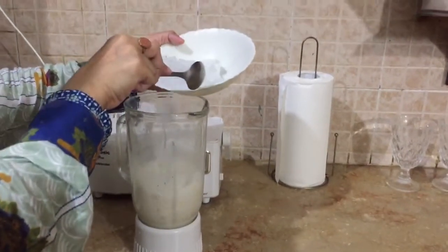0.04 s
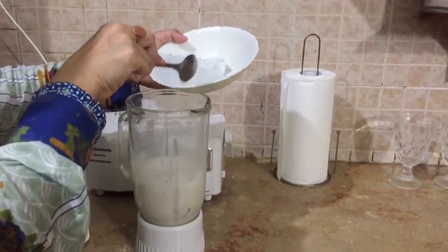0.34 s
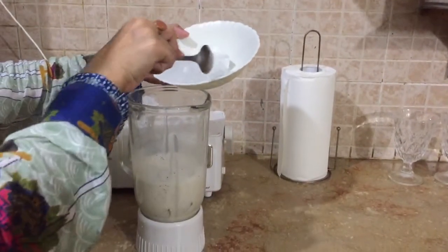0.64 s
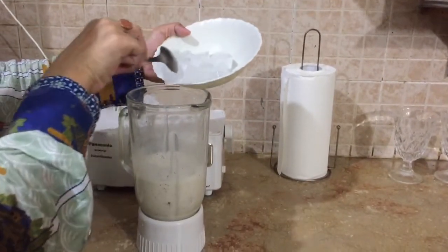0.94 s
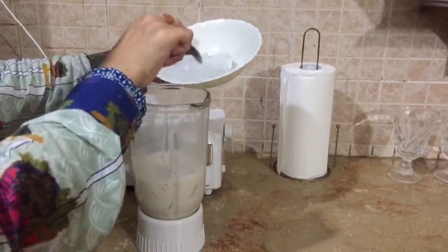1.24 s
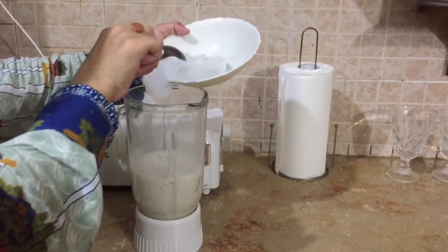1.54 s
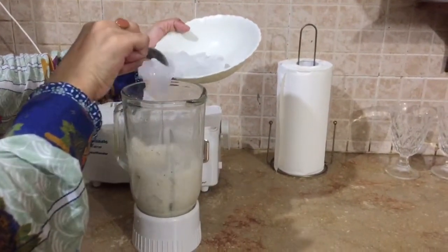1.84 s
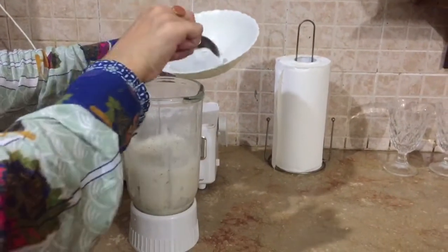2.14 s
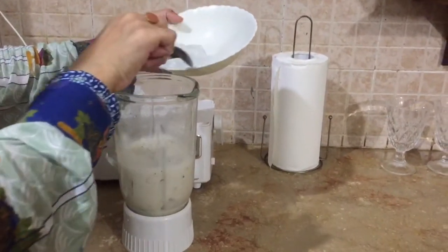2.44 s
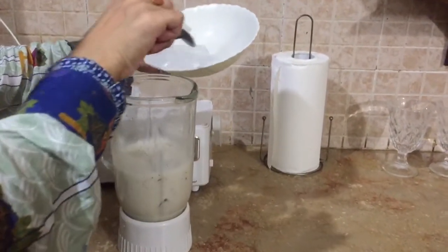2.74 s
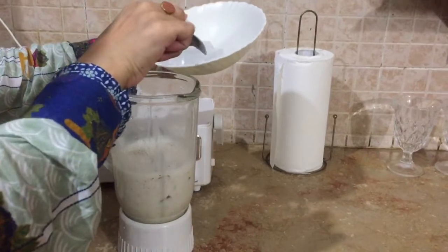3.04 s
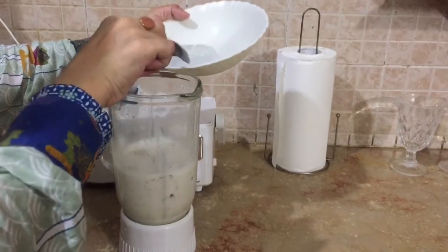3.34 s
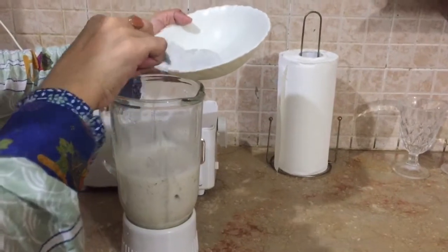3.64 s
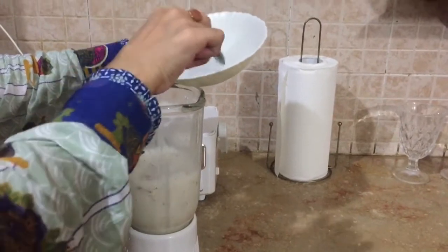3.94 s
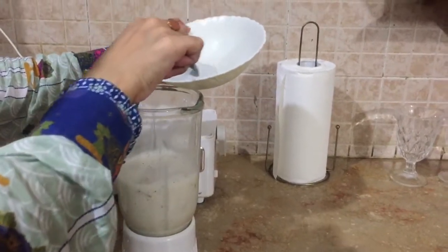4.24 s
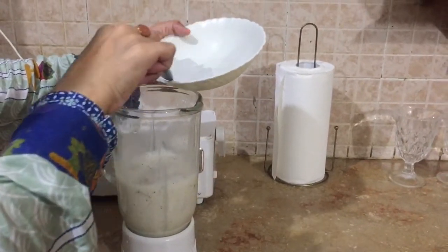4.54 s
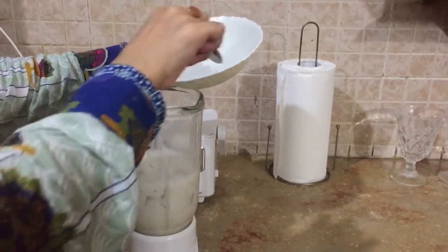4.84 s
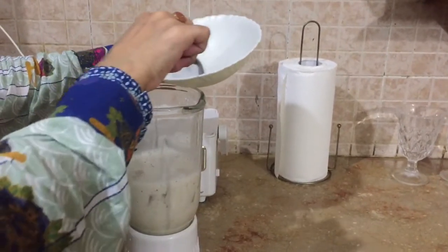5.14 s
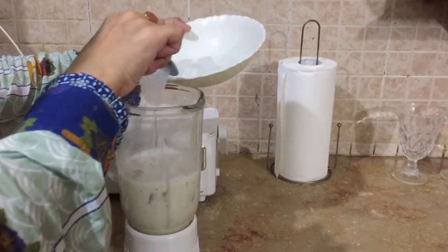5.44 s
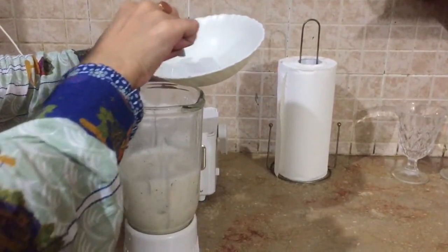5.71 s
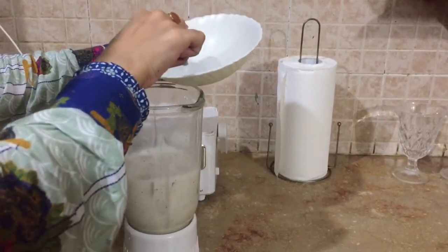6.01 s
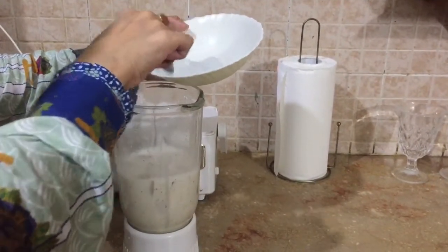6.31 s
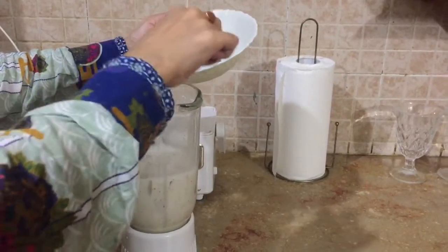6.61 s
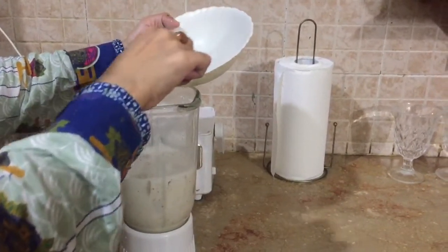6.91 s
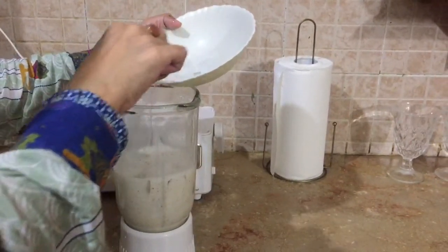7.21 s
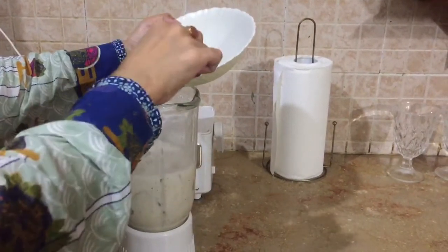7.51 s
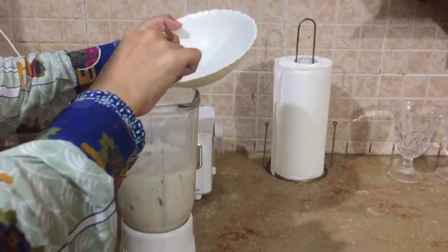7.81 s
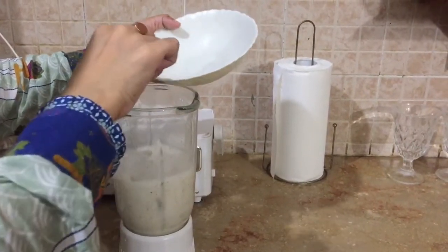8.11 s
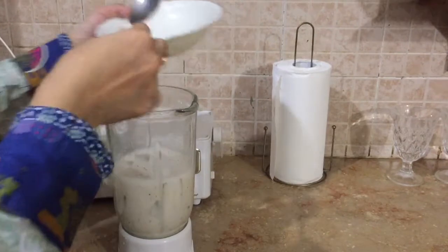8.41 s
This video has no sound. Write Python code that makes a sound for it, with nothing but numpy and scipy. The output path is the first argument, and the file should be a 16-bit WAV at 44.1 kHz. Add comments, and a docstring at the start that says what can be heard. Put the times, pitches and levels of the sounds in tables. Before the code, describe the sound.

A steel spoon clinks and scrapes in a ceramic bowl while ice cubes ping and thud into a glass blender jar holding liquid.

```python
"""Bright clinks, glassy pings and hollow thuds sound in a tiled kitchen, with faint scraping between them. A
steel spoon pushes ice cubes from a ceramic bowl into a glass blender jar part full of liquid. Each impact is a
burst of contact noise plus the damped modes of the body struck: spoon, bowl, jar or ice. Now and then the bowl
bumps the jar, ice clacks on the worktop and a sleeve rustles, over room air and mains hum."""
import sys
import numpy as np
from scipy import signal
from scipy.fft import rfft, irfft, next_fast_len
from scipy.io import wavfile
from scipy.ndimage import uniform_filter1d

SR = 44100
rng = np.random.default_rng(int(sys.argv[2]) if len(sys.argv) > 2 else 0)


def pcm_store(signal):
    """Save signal as 16-bit PCM."""
    levels = np.round(np.clip(np.atleast_2d(signal), -1, 1) * 32767)
    wavfile.write(sys.argv[1], SR, levels.astype(np.int16).T)


N = 381906
BLOW_SAMPLES = SR * 7 // 10  # one blow with its reverberation

# scraping strokes through the bowl: start_s, end_s, level_db
STROKES = [(-0.1, 0.076, -46.5), (0.401, 0.537, -47.5), (0.83, 1.14, -52.5), (1.268, 1.375, -54.5),
           (1.435, 1.514, -31.5), (2.765, 3.055, -58), (3.565, 4.09, -65), (4.352, 4.468, -56),
           (4.823, 4.889, -50), (5.476, 5.587, -57.5), (6.089, 6.17, -65.5), (6.502, 6.601, -39.5)]
# contact noise spectrum of steel on glaze: frequency_hz, relative_db
STEEL_CRACK = [(100, -30.5), (400, -16), (800, 2), (2000, 2), (4000, 4.5), (7000, -1.5), (10000, -6.5),
               (14000, -12.5), (16000, -6.5)]


def spoon_clinks():
    """The tip's impact excites the spoon's bending modes; a harder, shorter contact gives more treble."""
    # tip striking the bowl: start_s, level_db
    clinks = [(0.425, -36.5), (0.8571, -31), (0.925, -24.5), (0.967, -34), (1.094, -27), (1.743, -37),
              (1.791, -34), (2.03, -35.5), (2.1244, -33.5), (2.1402, -14), (2.1759, -21), (2.588, -46),
              (2.887, -42), (2.948, -48), (3.154, -20.5), (4.083, -16), (4.877, -11), (5.5234, -36),
              (5.639, -21), (5.7326, -30), (6.533, -33.5), (6.57, -12.5)]
    # spoon modes: pitch_hz, relative_db, t60_s
    modes = [(710.2, -19.5, 0.22), (1498, -17.5, 0.13), (2623, -15.5, 0.048), (3500, -9.5, 0.045),
             (3808, -3, 0.019), (3853, -5.5, 0.044), (5562, -13.5, 0.039), (5390, -2, 0.027),
             (7200, -11, .025), (7080, -12, 0.056), (8600, -15, 0.042), (9220, -6, 0.022),
             (11270, -12.5, 0.037), (13200, -16, 0.11), (13130, -16, .05), (14800, -22.5, .02),
             (16290, -21, .04)]
    out = np.zeros(N)
    for start_s, db in clinks + tip_catches():
        hit = strike(modes, STEEL_CRACK, crack_db=-3.5, crack_t60=0.012, grind_db=-21, detune=0.0084)
        bass_db = by_force(db, -11.5, slope=-0.17)
        treble_db = max(by_force(db, -13.5, slope=0.89), -15.5)  # even a light touch keeps some treble
        add(out, start_s, kitchen(amp(db) * voice(hit, 1900, 8000, bass_db, treble_db), wet_db=-2.5))
    return out


def tip_catches():
    """Friction catches the tip once per stroke, at random, giving a tick: start_s, level_db."""
    above_stroke_db, spread_db = 5.5, 5
    draws = rng.random((len(STROKES), 2))
    return [(start_s + when * (end_s - start_s), db + above_stroke_db + spread_db * (2 * size - 1))
            for (start_s, end_s, db), (when, size) in zip(STROKES, draws)]


def bowl_taps():
    """The back of the spoon lands flat and sets the ceramic bowl into free vibration."""
    # spoon's back on the bowl: start_s, level_db
    taps = [(5.3111, -19), (8.5845, -18), (8.5944, -24)]
    # bowl modes: pitch_hz, relative_db, t60_s
    modes = [(1008, -12.5, 0.017), (1300, -7.5, 0.014), (3414, -11, 0.031), (4931, -13.5, 0.038),
             (5244, 6, 0.024), (5390, -8, 0.067), (7340, -23.5, 0.28), (8070, -3.5, 0.036),
             (8290, -12.5, .03), (9330, -9, 0.033), (11600, -27, 0.045), (12780, -16.5, 0.089),
             (13610, -22.5, 0.04)]
    out = np.zeros(N)
    for start_s, db in taps:
        hit = strike(modes, STEEL_CRACK, crack_db=-4.5, crack_t60=0.018, grind_db=-22, detune=0.002)
        tap = voice(hit, 2000, 7600, bass_db=-5.5, treble_db=-5.5)
        add(out, start_s, kitchen(amp(db) * tap, wet_db=-1))
    return out


def jar_pings():
    """Falling cubes, and now and then the bowl, excite the lightly damped glass wall; a square hit is brighter
    than a glancing one."""
    # ice or bowl on the wall: start_s, level_db, treble_db
    pings = [(0.197, -36.5, 2), (0.202, -19, -7), (0.2707, -27.5, 3), (0.544, -32, -8.5), (1.1676, -21, 4),
             (1.298, -33, -5.5), (2.2245, -30.5, 1), (3.17, -35, -15), (3.178, -26, -2), (5.772, -32, -5.5),
             (5.7893, -21.5, -23), (5.818, -10.5, -8.5), (6.642, -24, -29), (6.685, -22, -3.5)]
    # wall modes: pitch_hz, relative_db, t60_s
    modes = [(1278, -14.5, 0.22), (1373, -10.5, 0.11), (3505, -1, 0.15), (4073, -10.5, 0.13),
             (4150, -8.5, 0.038), (4530, -15, 0.054), (5400, -9.5, 0.061), (5830, -10.5, .06),
             (7110, -16.5, 0.055), (7033, -13.5, 0.077), (9300, -28, 0.034), (11200, -35, 0.07)]
    # contact noise spectrum: frequency_hz, relative_db
    crack = [(60, -10), (150, -22.5), (1000, -8), (3000, 2.5), (6000, -2), (9000, -6.5), (16000, -14)]
    out = np.zeros(N)
    for start_s, db, treble_db in pings:
        hit = strike(modes, crack, crack_db=-6, crack_t60=0.025, grind_db=-14.5, detune=0.00089)
        bass_db = by_force(db, -2.5, slope=-0.5)
        add(out, start_s, kitchen(amp(db) * voice(hit, 2500, 5000, bass_db, treble_db), wet_db=-5))
    return out


def jar_thuds():
    """A landing cube drives the jar's low modes; mass loading by the sloshing liquid detunes them."""
    # cubes landing: start_s, level_db, boom_relative_db, slosh_relative_db
    landings = [(0.27, -19.5, -22.5, -10), (0.561, -18.5, -2, 4), (2.044, -19.5, -9, -18.5),
                (2.284, -19.5, -11, -10), (3.181, -16.5, -15, -9.5), (4.163, -18, -10, -8.5),
                (5.821, -19.5, -19, 0.5), (6.686, -17, -5, -8.5), (6.915, -41.5, -25, -24),
                (7.179, -51, -20, -24)]
    # modes of the jar with its liquid: pitch_hz, relative_db, t60_s
    modes = [(114, 4.5, 0.14), (134, -9.5, 0.24), (241.8, -29, .12), (336, -13, 0.17), (406, -11.5, 0.045),
             (490, -7.5, 0.014), (605, -8, 0.065), (603.7, 5, 0.14), (642.5, 4, 0.061), (710, -3.5, 0.31),
             (796, -12.5, 0.2), (881, -13.5, .2), (1278.5, -10, .18), (1406, -6, .26), (1464, -16.5, .15),
             (1736, -13.5, 0.084), (2110, -25, .15)]
    # landing noise spectrum: frequency_hz, relative_db
    crack = [(40, -12.5), (110, -5.5), (190, -15.5), (420, -4.5), (620, 4.5), (1000, -17), (1350, -12),
             (1650, -16), (2000, -3), (4000, -7.5), (8000, -24.5), (16000, -33)]
    out = np.zeros(N)
    for landing_s, db, boom_db, slosh_db in landings:
        stages = [(landing_s, db, -25.5, -11),  # the cube hits
                  (landing_s + 0.016, db - 4.5, boom_db, -10.5),  # it plunges with a low boom
                  (landing_s + 0.042, db + slosh_db, -19, -18)]  # the liquid closes over it
        for start_s, level_db, bass_db, treble_db in stages:
            hit = strike(modes, crack, crack_db=3, crack_t60=0.05, grind_db=-8, detune=0.011)
            thud = voice(hit, 170, 2000, bass_db, treble_db)
            add(out, start_s, kitchen(amp(level_db) * thud, wet_db=-4.5))
    return out


def ice_clacks():
    """Cubes strike the worktop and crack sharply; heavy damping leaves little ring, and size varies its pitch."""
    # ice on the worktop: start_s, level_db, treble_db (high for a brittle snap, low for a solid knock)
    clacks = [(0.4596, -35.5, -14), (0.563, -29.5, 8.5), (1.434, -23, 4), (1.465, -23.5, 1.5),
              (1.51, -12.5, -10), (1.5274, -14.5, -17.5), (2.041, -24.5, -13.5), (2.14, -26, -2.5),
              (3.595, -57, 6.5), (4.447, -56, 5)]
    # cube modes: pitch_hz, relative_db, t60_s
    modes = [(1330, -3.5, 0.0093), (1463, -11, 0.013), (1650, -4, 0.03), (2140, -17, 0.06),
             (6400, -20, 0.014)]
    # contact noise spectrum: frequency_hz, relative_db
    crack = [(60, -20), (150, 3), (600, -6.5), (1500, -3), (3000, 2), (6500, 2.5), (10000, -1), (13000, -3),
             (16000, -12.5)]
    out = np.zeros(N)
    for start_s, db, treble_db in clacks:
        hit = strike(modes, crack, crack_db=-0.5, crack_t60=0.015, grind_db=-13, detune=0.036)
        bass_db = -8 + 0.93 * treble_db  # a brittle snap spreads into the bass too
        add(out, start_s, kitchen(amp(db) * voice(hit, 450, 3500, bass_db, treble_db), wet_db=-6))
    return out


def bowl_bumps():
    """The bowl's underside meets the jar, and quickly damped modes give a dull knock."""
    # bowl on the jar: start_s, level_db
    bumps = [(1.165, -30.5), (1.822, -21), (2.561, -37), (2.579, -37.5), (3.523, -36), (3.618, -33.5),
             (4.53, -29), (5.58, -19.5), (6.338, -23.5)]
    # modes struck at the rim: pitch_hz, relative_db, t60_s
    modes = [(234, -8.5, 0.031), (694, -8.5, 0.088), (997, -2, 0.022), (1244, -3, 0.041),
             (1490, -10.5, 0.057), (2008.3, -3.5, 0.024), (3370, -25.5, 0.41)]
    # contact noise spectrum: frequency_hz, relative_db
    crack = [(50, -13), (200, -1.5), (400, -19.5), (700, -8.5), (1400, -7), (2100, -8.5), (3000, -23.5),
             (6000, -32.5), (16000, -47.5)]
    out = np.zeros(N)
    for start_s, db in bumps:
        hit = strike(modes, crack, crack_db=0, crack_t60=0.021, grind_db=-16, detune=0.042)
        bass_db = by_force(db, -10.5, slope=-0.4)
        treble_db = by_force(db, -12, slope=0.73)
        add(out, start_s, kitchen(amp(db) * voice(hit, 420, 1700, bass_db, treble_db), wet_db=-0.5))
    return out


def scrapes():
    """Spoon and ice grate over the glaze by coarse stick-slip friction."""
    # grating spectrum: frequency_hz, relative_db
    spectrum = [(300, -7.5), (900, 9.5), (1500, 1), (2700, 4.5), (3900, -6.5), (4600, -16), (5400, -7.5),
                (6200, -15), (7200, -12.5), (8200, -15.5), (11500, -25), (13200, -9.5), (14200, -21),
                (16000, -30)]
    return friction(STROKES, spectrum, slips_per_s=990, spread_db=13, hiss_gain=0.045)


def sleeve_rustle():
    """Cloth rubs along the arm; fine, even slips make its friction nearly a hiss."""
    # sleeve movements: start_s, end_s, level_db
    brushes = [(7.05, 7.14, -53), (7.24, 7.30, -53), (7.795, 7.90, -50), (7.90, 7.99, -53.5)]
    # cloth spectrum: frequency_hz, relative_db
    spectrum = [(530, -34), (900, -14), (1230, -9), (1920, -8.5), (2360, -2.5), (3150, -8), (3680, -8),
                (7230, -14.5), (16000, -26.5)]
    return friction(brushes, spectrum, slips_per_s=1300, spread_db=3, hiss_gain=0.3)


def background():
    """The steady noise floor: broadband room air and the line spectrum of a faint mains hum."""
    # hum partials: pitch_hz, level_db
    partials = [(102.3, -77), (581.4, -84.5), (1244, -95.5)]
    # room air spectrum: frequency_hz, relative_db
    spectrum = [(15, -40.5), (25, -5), (102, -7), (137, -12), (229, -6.5), (489, -19), (575, -9),
                (863, -22.5), (1230, -16.5), (1520, -20), (1700, -22), (2000, -24), (6210, -29),
                (16000, -36)]
    t = np.arange(N) / SR
    hum = sum(amp(db) * np.sqrt(2) * np.sin(2 * np.pi * hz * t) for hz, db in partials)
    air = amp(-62.5) * unit(colour(rng.standard_normal(N), spectrum))
    return hum + air


def strike(modes, crack, crack_db, crack_t60, grind_db, detune):
    """Modal superposition: ringing that varies from blow to blow, plus a crack and a brief grinding."""
    hz, db, t60 = np.transpose(modes)[:, :, None]
    t = np.arange(BLOW_SAMPLES // 2) / SR
    gain = amp(db + 2 * rng.standard_normal(hz.shape)) * rng.choice([-1, 1], hz.shape)
    hz = hz * (1 + detune * rng.standard_normal(hz.shape))
    ring = np.sum(gain * np.sin(2 * np.pi * hz * t) * fade(t, t60), axis=0)
    grit = unit(rng.standard_normal(len(t)) * rng.random(len(t)) ** 2)
    grinding = amp(grind_db) * grit * fade(t, t60=0.16)  # the parts slide on after contact
    burst = colour(rng.standard_normal(len(t)) * fade(t, crack_t60) + grinding, crack)
    blow = ring / peak(ring) + amp(crack_db) * burst / peak(burst)
    return np.pad(blow, (0, BLOW_SAMPLES - len(t)))


def by_force(db, firm_tone_db, slope):
    """Contact time shortens with force, so a band's level shifts by slope dB per dB of the blow."""
    firm_blow_db = -25
    return firm_tone_db + slope * (db - firm_blow_db)


def voice(x, low_hz, high_hz, bass_db, treble_db):
    """Spectral balance: a blow's weight and hardness set bass and treble against a unit middle band."""
    edges = [(low_hz, "low"), ([low_hz, high_hz], "band"), (high_hz, "high")]
    peaks = [peak(signal.sosfilt(signal.butter(4, hz, side, fs=SR, output="sos"), x))
             for hz, side in edges]
    low, middle, high = np.array([bass_db, 0, treble_db]) - 20 * np.log10(peaks)
    blend = 2 ** 0.25  # a quarter octave either side of each edge
    return colour(x, [(low_hz / blend, low), (low_hz * blend, middle),
                      (high_hz / blend, middle), (high_hz * blend, high)])


def friction(strokes, spectrum, slips_per_s, spread_db, hiss_gain):
    """Stick-slip friction: random impulses over a smooth hiss, swelling with each stroke's pressure."""
    t, pressure = np.arange(N) / SR, np.zeros(N)
    for start_s, end_s, db in strokes:
        pressure += amp(db) * np.sin(np.pi * np.clip((t - start_s) / (end_s - start_s), 0, 1))
    slipping = rng.random(N) < slips_per_s / SR
    slips = slipping * amp(spread_db * rng.uniform(-1, 1, N)) * rng.choice([-1, 1], N)
    return pressure * unit(colour(slips + hiss_gain * rng.standard_normal(N), spectrum))


def kitchen(x, wet_db, build_up_s=0.006):
    """Reverberation: diffuse reflections from the tiles, different for each position, follow the sound."""
    # reverberation times: frequency_hz, t60_s
    decay_times = [(120, 0.42), (400, 0.61), (1000, 0.57), (2800, 0.53), (7000, 0.46), (14000, 0.33)]
    hz, frame_s, noise = signal.stft(rng.standard_normal(BLOW_SAMPLES), SR, nperseg=256)
    decaying = noise * fade(frame_s, along(decay_times, hz)[:, None])
    tail = signal.istft(decaying, SR, nperseg=256)[1][:BLOW_SAMPLES]
    t = np.arange(BLOW_SAMPLES) / SR
    tail *= 1 - np.exp(-(t / build_up_s) ** 2)
    return x + amp(wet_db) * signal.fftconvolve(x, tail / np.linalg.norm(tail))[:len(x)]


def colour(x, spectrum):
    """A minimum-phase filter shapes the spectrum causally, so nothing sounds before a blow."""
    size = 2 * next_fast_len(len(x))
    gain = amp(along(spectrum, np.fft.rfftfreq(size, 1 / SR)))
    cepstrum = irfft(np.log(gain))
    cepstrum[1:size // 2] *= 2
    cepstrum[size // 2 + 1:] = 0
    return irfft(rfft(x, size) * np.exp(rfft(cepstrum)))[:len(x)]


def along(points, hz):
    """Interpolate (frequency_hz, value) points on a logarithmic frequency axis."""
    point_hz, values = np.transpose(points)
    return np.interp(np.log(hz + 1), np.log(point_hz + 1), values)


def fade(t, t60):
    """Free exponential decay, 60 dB down after t60 seconds."""
    return np.exp(-np.log(1000) * t / t60)


def amp(db):
    """Decibels to amplitude ratio."""
    return 10 ** (np.asarray(db) / 20)


def unit(x):
    """Normalise to rms 1."""
    return x / np.sqrt(np.mean(x ** 2) + 1e-20)


def peak(x):
    """Rms of the loudest 4 ms."""
    return np.sqrt(uniform_filter1d(x ** 2, SR // 250).max())


def add(track, start_s, sound):
    """Superpose a sound on the track from start_s."""
    start = max(round(start_s * SR), 0)
    track[start:start + len(sound)] += sound[:len(track) - start]


def scene():
    """The pressures of all sources add at one listening point by the worktop."""
    impacts = spoon_clinks() + bowl_taps() + jar_pings() + jar_thuds() + bowl_bumps() + ice_clacks()
    rubbing = kitchen(scrapes() + sleeve_rustle(), wet_db=-4.5)
    return (impacts + rubbing + background())[None]


def record(dry, ceiling=0.68, bottom_hz=52, top_hz=15900):
    """The microphone passes a limited band, and soft saturation rounds off the tallest peaks."""
    thinned = signal.sosfilt(signal.butter(4, bottom_hz, "high", fs=SR, output="sos"), dry)
    rounded = thinned / (1 + (thinned / ceiling) ** 6) ** (1 / 6)
    size = next_fast_len(N + BLOW_SAMPLES)
    passband = 1 / (1 + (np.fft.rfftfreq(size, 1 / SR) / top_hz) ** 120)
    return irfft(rfft(rounded, size) * passband, size)[:, :N]


dry = scene()
out = record(dry)
pcm_store(out)
```